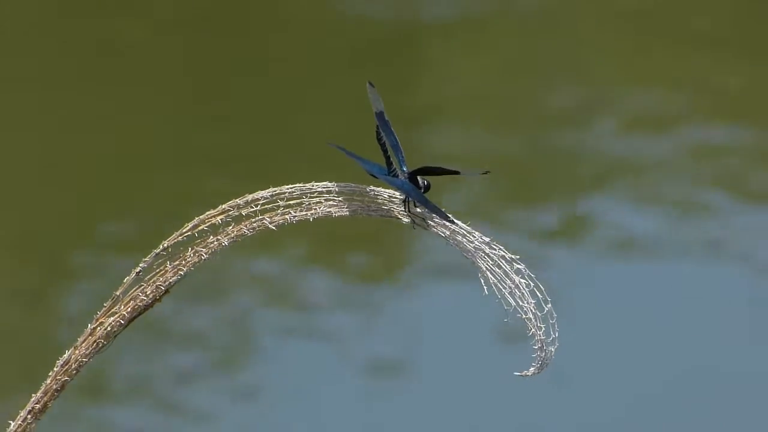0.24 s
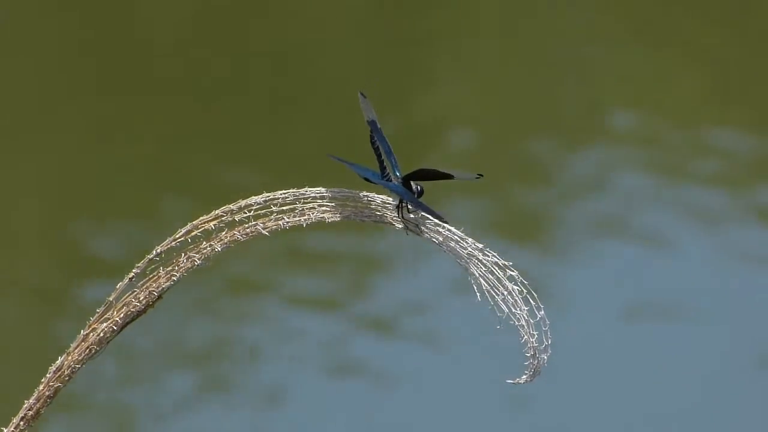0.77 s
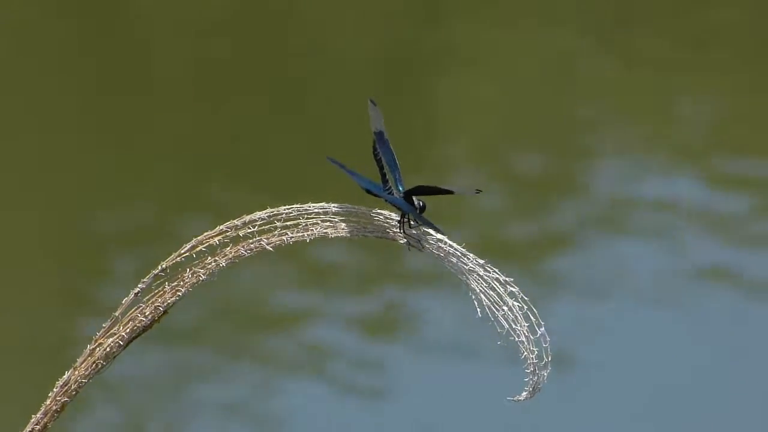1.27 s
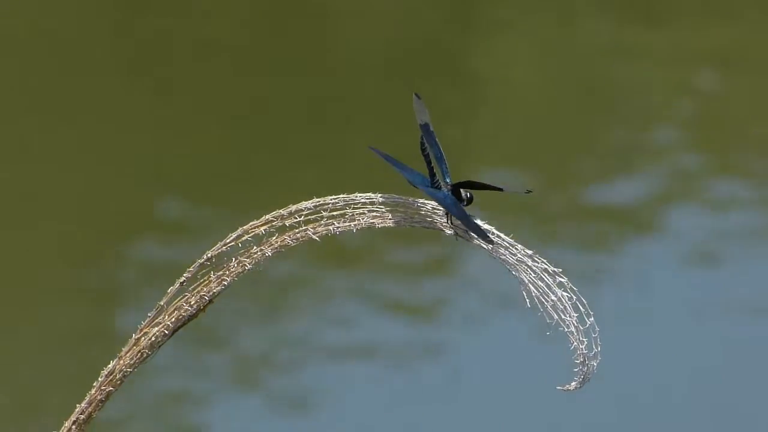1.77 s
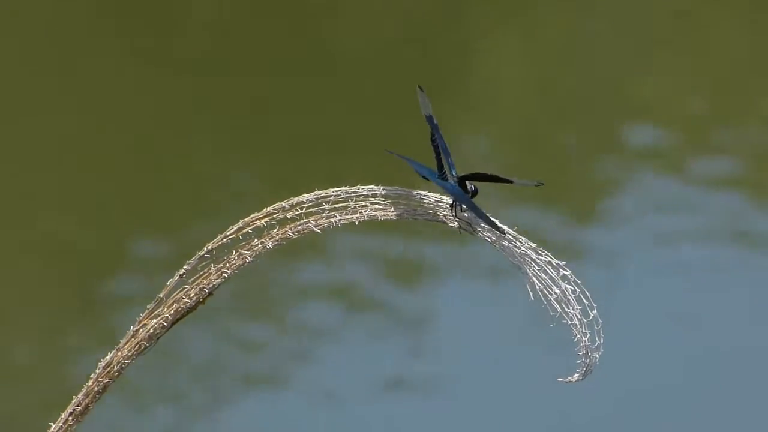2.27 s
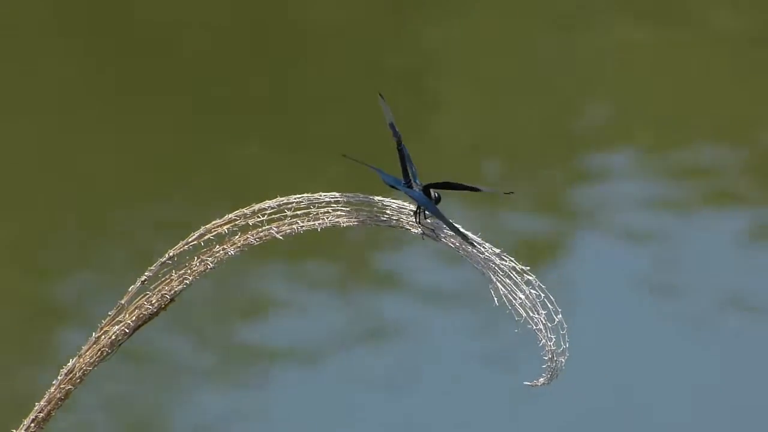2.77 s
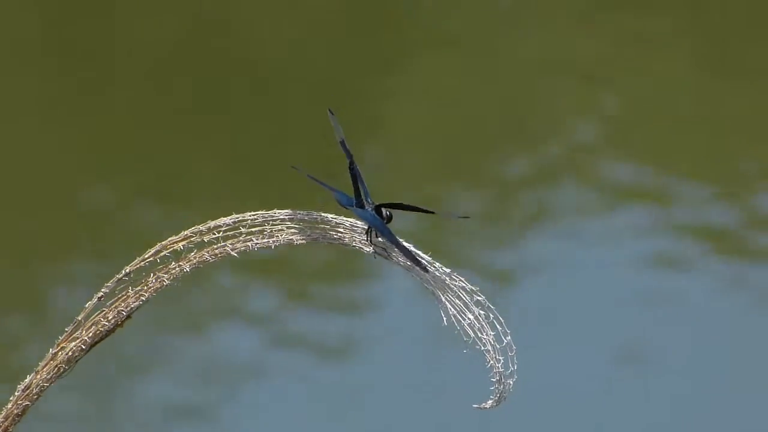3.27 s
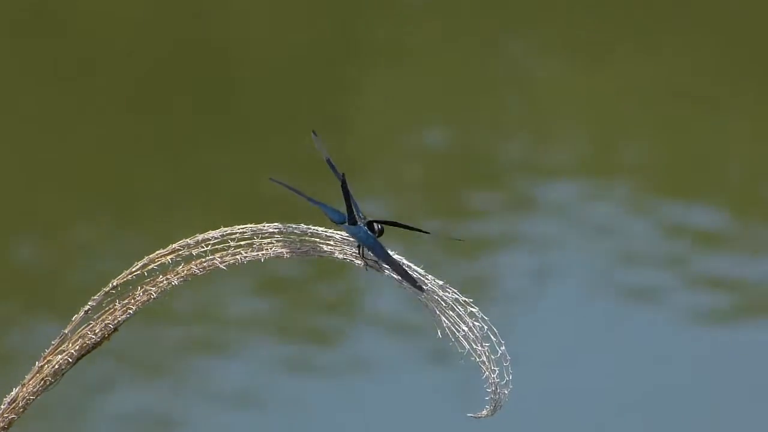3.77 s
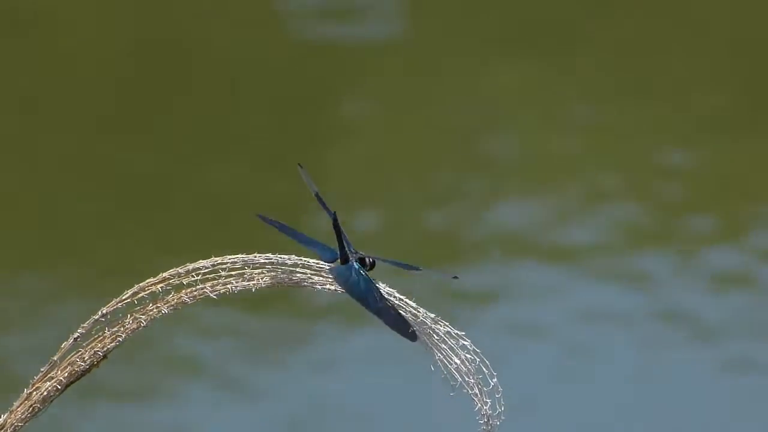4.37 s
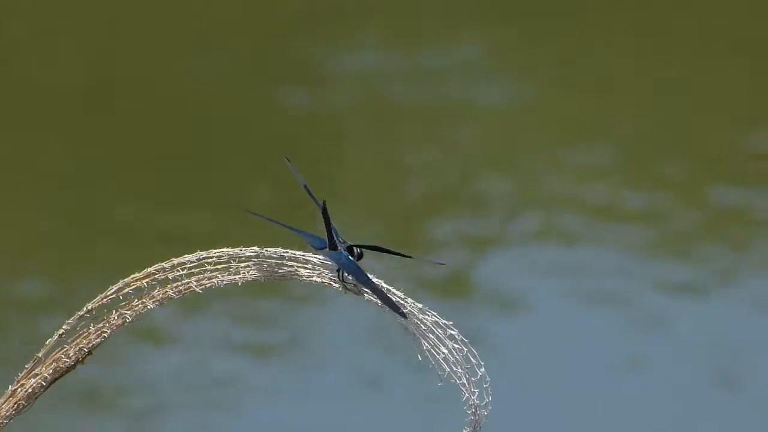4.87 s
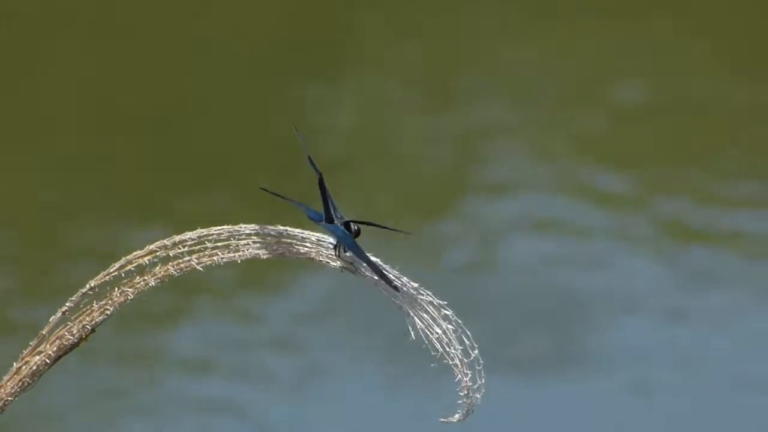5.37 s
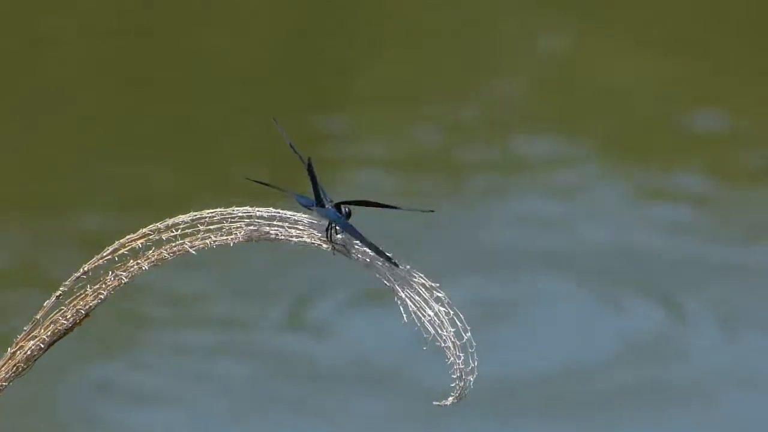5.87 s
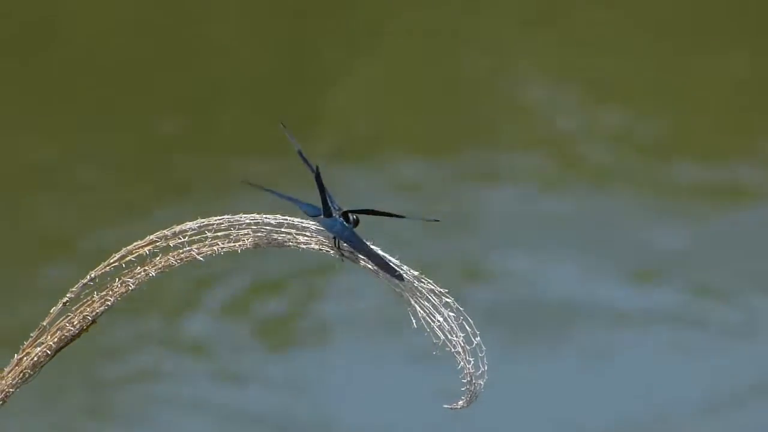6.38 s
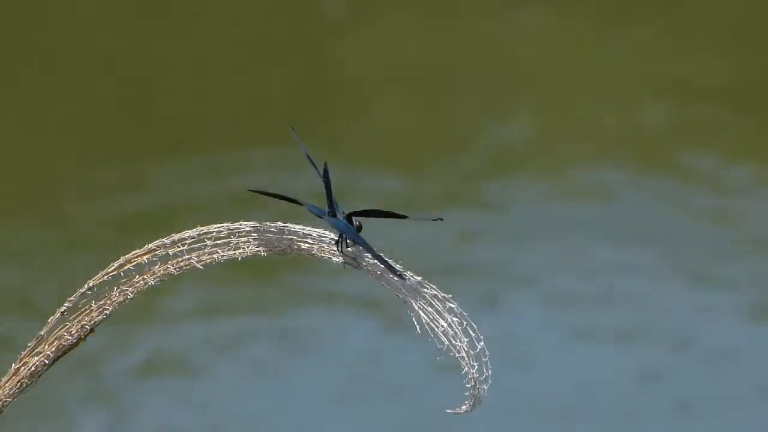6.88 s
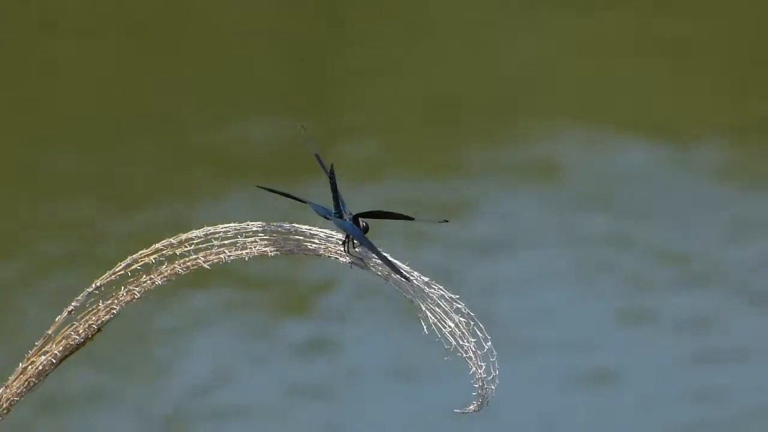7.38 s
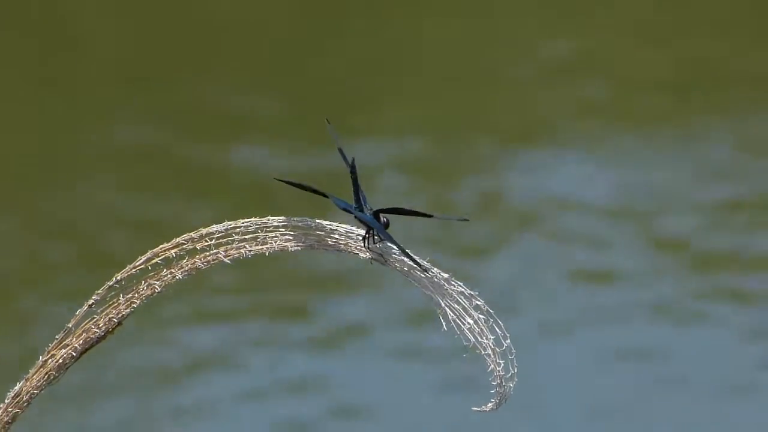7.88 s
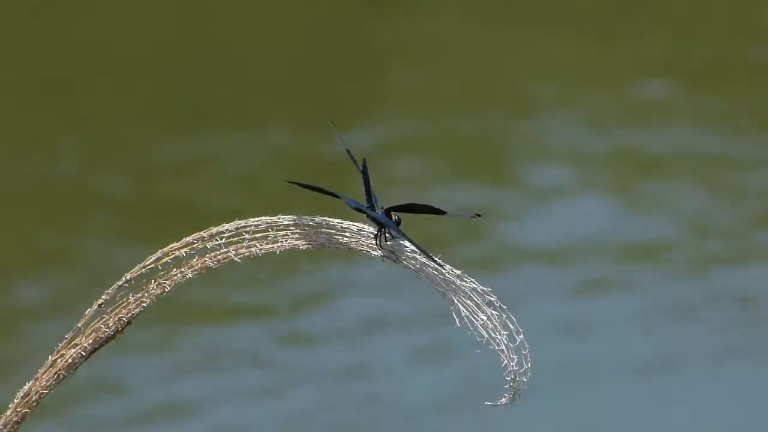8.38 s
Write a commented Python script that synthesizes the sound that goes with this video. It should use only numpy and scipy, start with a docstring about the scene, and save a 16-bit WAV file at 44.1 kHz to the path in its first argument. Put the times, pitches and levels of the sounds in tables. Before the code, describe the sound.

Loud continuous high-pitched cicada chorus by a pond, hissing and sizzling without pause, over a very faint low patchy background hum.

```python
"""Three crowds of cicadas: jittered click trains, smeared and filtered to each crowd's body colour.
Twice a thin whine on the right: two wavering sines that beat, plus narrow-band noise as echo.
Three soft swells of band noise; the last two lie near the whine onsets, below them in pitch.
Background: faint far-off filtered noise and low humming bands, with patchy dropouts."""
import sys
import numpy as np
from scipy import signal
from scipy.fft import rfft, irfft
from scipy.io import wavfile
from scipy.ndimage import uniform_filter1d

SR = 44100
rng = np.random.default_rng(int(sys.argv[2]) if len(sys.argv) > 2 else 0)


def wav_out(sig):
    """Save sig, one row per channel (or a flat mono array), as 16-bit PCM at SR to the path in sys.argv[1]."""
    wavfile.write(sys.argv[1], SR, np.round(np.clip(np.atleast_2d(sig).T, -1, 1) * 32767).astype(np.int16))


N = 381024
T_S = np.arange(N) / SR
HZ = np.fft.rfftfreq(N, 1 / SR)

# Body colour of each crowd, relative density: freq_hz, density_db
SHRILL_COLOUR = [(4500, -120), (6200, -42), (6900, -17), (7400, -2), (7900, 2.5), (8500, 1.5), (9300, -6),
                 (10200, -17), (11200, -25.5), (12500, -29.5), (14000, -31), (14800, -36), (15200, -47)]
BUZZ_COLOUR = [(3000, -120), (4100, -48), (4380, -18.5), (4700, -3), (5000, -3), (5500, 0.5), (6200, 0.5),
               (7100, -2.5), (7600, -6.5), (9000, -40), (12000, -120)]
RASP_COLOUR = [(1900, -120), (2050, -50), (2150, -22), (2225, -6.5), (2530, -4.5), (2630, 3), (2740, -2.5),
               (3150, 0.5), (3400, -4), (3560, -7), (3780, -7), (3950, -1), (4200, 0), (4380, -2.5),
               (4700, -22), (6000, -120)]
# Crowd level: start_db, growth_db_per_s
SHRILL_DB, BUZZ_DB, RASP_DB = (-25, 0.14), (-25.5, -0.093), (-44, 0.15)
PAN_DB_PER_S = 0.04  # left over right, chorus only

# Likeness of the two microphone ports: freq_hz, correlation (-1..1)
PORT_LIKENESS = [(15, -1), (32, 0.5), (70, .45), (200, 0.2), (330, -0.05), (500, 0.4), (640, -0.6),
                 (800, 0.5), (1200, -0.02), (1900, 0), (2300, 0.5), (2900, 0.83), (3700, 0.45),
                 (4700, 0.75), (6200, 0.78), (7100, 0.85), (7900, 0.67), (8800, .5), (9500, 0.5),
                 (12000, 0.5), (14500, 0.2)]
# Phase lead of the left port: freq_hz, lead_rad
LEFT_LEAD = [(2000, -0.091), (5300, 0.045), (7100, -0.041), (7600, 0.31), (8300, -0.089), (9100, -.25),
             (9900, 0.36), (11000, 0)]
# Left over right: freq_hz, tilt_db
LEFT_TILT = [(30, -3), (100, 0), (250, -4.5), (640, -4), (1100, -5), (1900, -2.5), (2600, 2), (4500, .5),
             (5600, -0.5), (6700, 0.5), (7800, 0), (9400, 1.5), (11000, 0), (13000, 0), (14800, -1)]

# Whines: start_s, hold_s, drop_s, tail_s, level_db, flutter_db (rms), blur (0-1, echo over tone)
WHINES = [(3.9, 1.66, .14, .37, -51.5, 3.0, .65), (6.69, .62, .33, .27, -48.5, 1.2, .3)]
# Two voices, one table per whine: time_s, upper_hz, lower_hz, lower_over_upper_db
WHINE_VOICES = [
    [(3.9, 1632, 1618, -3), (4.35, 1648, 1618, -7), (4.55, 1647, 1612, 2), (4.7, 1650, 1612, 1.5),
     (5.06, 1633, 1618, -8), (5.25, 1630, 1603, 3), (5.32, 1682, 1600, 1), (5.56, 1680, 1610, 2),
     (5.62, 1630, 1615, 2), (6.2, 1650, 1610, 0)],
    [(6.7, 1656, 1618, -16), (7.1, 1655, 1605, -14), (7.2, 1648, 1603, -5), (7.45, 1637, 1616, -6),
     (7.7, 1645, 1620, -3), (8.1, 1640, 1600, 0)],
]
# Brief whine surges (+) and dips (-): time_s, change_db
WHINE_SURGES = [(4.23, 3), (4.45, -6), (4.6, 6), (4.85, -8), (5.06, 9), (5.55, 5), (6.14, 4), (6.98, -6),
                (7.52, -5), (7.77, -7), (7.95, 5)]
SURGE_S, FLUTTERS_PER_S = 0.024, 14.0
WHINE_RISE_S, WHINE_START_DB, WHINE_TAIL_DB = .12, -22, -13
TAIL_BLUR = 1.2  # tail is mostly echo

# Noise swells, before dropouts: centre_s, length_s, centre_hz, width_hz, level_db
SWELLS = [(1.3, .6, 1260, 260, -57), (3.97, 0.41, 1280, 240, -54.5), (6.45, 0.41, 1295, 260, -58)]
# Humming bands, before waver and dropouts: centre_hz, width_hz, level_db
HUM_BANDS = [(385, 92, -62), (648, 112, -57)]
# Far wash colour, relative density: freq_hz, density_db
WASH_COLOUR = [(10, -6.5), (24, -6), (48, -16), (91, -28), (140, -21), (200, -14.5), (380, -10.5),
               (500, -13), (920, -10.5), (1300, -13.5), (1500, -14), (1750, -21.5), (1920, -20.5),
               (2020, -9), (2200, -17.5), (2400, -59), (3000, -120)]
# Far wash level before dropouts: time_s, level_db
WASH_LEVEL = [(0, -55.5), (1.5, -55.5), (3.1, -56.5), (3.9, -54), (4.6, -57.5), (5.6, -56), (6.5, -55.5),
              (7.5, -56.5), (8.64, -56.5)]
# Depth of the dropouts: freq_hz, depth_db
GAP_DEPTH = [(30, 1.4), (70, 8), (140, 32), (300, 7), (1000, 8), (1350, 30), (1700, 50), (2100, 22)]
# Share of time in dropout: freq_hz, share (0-1)
GAP_SHARE = [(100, 0.51), (250, 0.11), (1100, 0.22), (1450, 0.68), (1750, 0.85), (1920, 0.62), (2020, 0.32),
             (2200, 0.1)]
# Added dropout share near 1650 Hz: early, late, changeover
GAPS_EARLY, GAPS_LATE, GAPS_FILL_AT_S, GAPS_FILL_S = .13, -.09, 3.74, .3
# Gain bump near 140 Hz: decays and wavers
RUMBLE_START_DB, RUMBLE_FADE_S, RUMBLE_END_DB, RUMBLE_WAVER_DB = 11, 3.5, -2, 3.0

EDGE_HZ = 15250
OFFSET = -.00357


def clicks(per_s, jitter, count=90):
    """Each insect buckles its drum in and out: alternating clicks at its own pace and level."""
    steps = int(1.5 * per_s * N / SR)
    period = SR / (per_s * rng.uniform(.75, 1.25, (count, 1)))  # samples
    intervals = period * (1 + jitter * rng.uniform(-1, 1, (count, steps)))
    at = np.cumsum(intervals, axis=1) - 2 * period
    loudness = amp(2.2 * rng.standard_normal((count, 1)))
    size = loudness * (-1.) ** np.arange(steps)
    keep = (at >= 0) & (at < N)
    direct = np.bincount(at[keep].astype(int), size[keep], N)
    # leaves and water scatter each click: short decaying smear, flat spectrum
    smear = rng.standard_normal(600) * amp(-60 * np.arange(600) / SR / .012)
    echo = irfft(np.exp(1j * np.angle(rfft(smear, 4096))), 4096)
    return evened(signal.oaconvolve(direct, echo)[:N])


def crowd(colour, level_db, per_s, jitter, throb_db, throbs_per_s):
    """Clicks ring the bodies; the crowd level throbs at random."""
    pair = ports(clicks(per_s, jitter), clicks(per_s, jitter), colour)
    return pair * amp(level_db + throb_db * drift(throbs_per_s))


def chorus():
    """Sum of the three crowds, leaning slowly to the left."""
    shrill_db, buzz_db, rasp_db = (
        start_db + growth * T_S for start_db, growth in (SHRILL_DB, BUZZ_DB, RASP_DB))
    out = crowd(SHRILL_COLOUR, shrill_db, per_s=400, jitter=.3, throb_db=0.44, throbs_per_s=25)
    out = out + crowd(BUZZ_COLOUR, buzz_db, per_s=350, jitter=.3, throb_db=0.01, throbs_per_s=20)
    out = out + crowd(RASP_COLOUR, rasp_db, per_s=260, jitter=.3, throb_db=1.0, throbs_per_s=15)
    pan_db = PAN_DB_PER_S * (T_S - T_S.mean())
    return out * amp(np.outer([.5, -.5], pan_db))


def whine(call, voices):
    """Two thin voices beat against each other; echoes blur them differently at each port."""
    start_s, hold_s, drop_s, tail_s, level_db, flutter_db, blur = call
    at_s = start_s + np.cumsum([0, WHINE_RISE_S, hold_s, drop_s, tail_s])
    shape_db = np.interp(T_S, at_s, [WHINE_START_DB, 0, 0, WHINE_TAIL_DB, WHINE_TAIL_DB - 3.0])
    surge_db = sum(db * np.exp(-((T_S - s) / SURGE_S) ** 2) for s, db in WHINE_SURGES)
    blur = np.interp(T_S, at_s[2:4], [blur, TAIL_BLUR])
    time_s, *columns = np.transpose(voices)
    upper_hz, lower_hz, lower_db = (np.interp(T_S, time_s, c) for c in columns)

    out = np.zeros((2, N))
    for hz, voice_db in ((upper_hz, 0), (lower_hz, lower_db)):
        angle = 2 * np.pi * np.cumsum(hz + 2.0 * drift(11.7)) / SR
        # right port leads; shifting echoes make the lead wander
        lead = .45 + np.minimum(blur, .6) * drift(6.0)
        tone = np.sqrt(2) * np.sin([angle - 1.65 * lead, angle + .5 * lead])
        tone = tone * amp([[-2.2], [3.0]])
        noises = rng.standard_normal((2, N))
        echo = np.array([evened(resonate(resonate(v, hz, 90.0), hz, 90.0)) for v in noises])
        echo = echo * amp([[-1.5], [2.5]])
        flutter = amp(voice_db + flutter_db * drift(FLUTTERS_PER_S))
        out += flutter * (tone + blur * echo)

    # hold the level whatever the voice balance and blur
    out *= amp(level_db + shape_db + surge_db) / np.sqrt((1 + amp(2 * lower_db)) * (1 + blur ** 2))
    edge_fade = np.clip(np.minimum(T_S - at_s[0], at_s[-1] - T_S) / 0.041, 0, 1)
    return out * edge_fade


def swells():
    """Resonant noise bands that rise and fade, same at both ports but louder right."""
    out = np.zeros(N)
    for centre_s, length_s, hz, width_hz, level_db in SWELLS:
        band = resonate(resonate(rng.standard_normal(N), hz, width_hz), hz, width_hz)
        envelope = np.exp(-((T_S - centre_s) / (length_s / 2)) ** 2)
        out += amp(level_db) * envelope * evened(band)
    return out * amp([[-1.5], [1.5]])


def hum():
    """Wavering resonant noise bands, mostly in opposite phase at the two ports."""
    out = np.zeros((2, N))
    for hz, width_hz, level_db in HUM_BANDS:
        both, left, right = rng.standard_normal((3, N))
        sources = (1.23 * both + left, right - 1.16 * both)
        bands = np.array([evened(resonate(v, hz, width_hz)) for v in sources])
        out += bands * amp(level_db + 2.3 * drift(8.5)) * amp([[-.8], [.8]])
    return out


def wash():
    """Far-off noise, hum and swells, with time-frequency dropouts, flicker and a rumble bump."""
    far = ports(*rng.standard_normal((2, N)), WASH_COLOUR)
    pair = far * amp(np.interp(T_S, *np.transpose(WASH_LEVEL))) + hum() + swells()
    hz, t_s, z = signal.stft(pair, SR, nperseg=2048, noverlap=1536)

    patches = uniform_filter1d(rng.standard_normal(z.shape[1:]), size=3, axis=0)
    patches = evened(uniform_filter1d(patches, size=5, axis=1))
    rank = 1 / (1 + np.exp(-1.7 * patches))  # roughly uniform, 0-1
    early = 1 / (1 + np.exp((t_s - GAPS_FILL_AT_S) / GAPS_FILL_S))
    extra = GAPS_LATE + (GAPS_EARLY - GAPS_LATE) * early
    share = read(GAP_SHARE, hz)[:, None] + np.outer(np.exp(-((hz - 1650) / 350) ** 2), extra)
    gap = 1 / (1 + np.exp((rank - share) / 0.027))
    gap_db = gap * read(GAP_DEPTH, hz)[:, None]

    flicker = evened(uniform_filter1d(rng.standard_normal(len(t_s)), size=3))
    flicker_db = 1.9 * flicker - 6.0 * np.maximum(-flicker - 1.6, 0)  # deepest dips exaggerated
    rumble_db = RUMBLE_END_DB + (RUMBLE_START_DB - RUMBLE_END_DB) * np.exp(-t_s / RUMBLE_FADE_S)
    rumble_db = rumble_db + RUMBLE_WAVER_DB * np.interp(t_s, T_S, drift(6.0))
    bump_db = np.outer(np.exp(-((hz - 140) / 60) ** 2), rumble_db)

    field_db = bump_db + flicker_db - gap_db
    return signal.istft(z * amp(field_db), SR, nperseg=2048, noverlap=1536)[1][:, :N]


def ports(a, b, colour):
    """Colours two unrelated sounds; mid/side mix sets correlation, tilt and lead at the ports."""
    turn = np.arccos(np.clip(read(PORT_LIKENESS, HZ), -1, 1)) / 2
    mid, side = rfft(a) * np.cos(turn), rfft(b) * np.sin(turn)
    lean = amp(read(LEFT_TILT, HZ) / 2) * np.exp(.5j * read(LEFT_LEAD, HZ))
    spectra = np.array([(mid + side) * lean, (mid - side) / lean])
    pair = irfft(spectra * amp(read(colour, HZ)), N)
    return pair / np.sqrt(np.mean(pair.mean(0) ** 2))  # rms 1 in mono


def resonate(x, hz, width_hz):
    """Resonator with movable centre: shift hz to zero, two one-pole low-passes, shift back."""
    turn = np.exp(2j * np.pi * np.cumsum(hz * np.ones(len(x))) / SR)
    r = np.exp(-np.pi * width_hz / SR)
    smooth = signal.lfilter([1], np.convolve([1, -r], [1, -r]), x / turn + 1e-18)
    return (turn * smooth).real


def drift(per_s):
    """Slow random curve, rms 1: noise under a Gaussian low-pass of scale per_s (Hz)."""
    return evened(irfft(rfft(rng.standard_normal(N)) * np.exp(-(HZ / per_s) ** 2), N))


def read(points, hz):
    """Interpolates a table on a log-frequency axis."""
    f_hz, value = np.transpose(points)
    return np.interp(np.log(hz + 1), np.log(f_hz + 1), value)


def evened(x):
    """Scales to rms 1."""
    return x / np.sqrt(np.mean(x ** 2) + 1e-20)


def amp(db):
    """Decibels to gain."""
    return 10 ** (np.asarray(db) / 20)


def scene():
    """Chorus, whines and wash."""
    whines = sum(whine(call, voices) for call, voices in zip(WHINES, WHINE_VOICES))
    return chorus() + whines + wash()


def record(dry):
    """Low-pass band limit and the converter's small constant offset."""
    lowpass = signal.firwin(1023, EDGE_HZ, window=("kaiser", 9), fs=SR)
    return signal.oaconvolve(dry, lowpass[None], "same") + OFFSET


dry = scene()
out = record(dry)
wav_out(out)
```